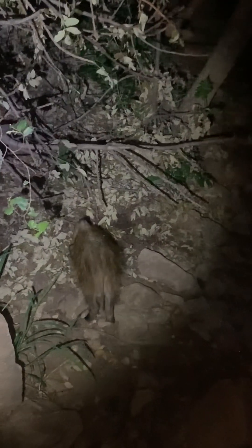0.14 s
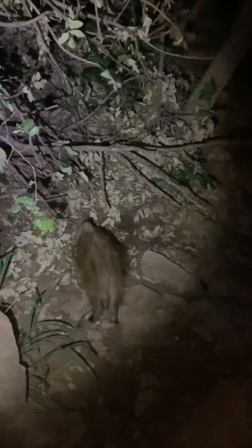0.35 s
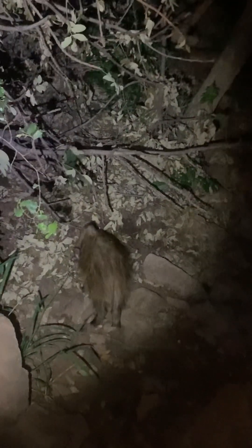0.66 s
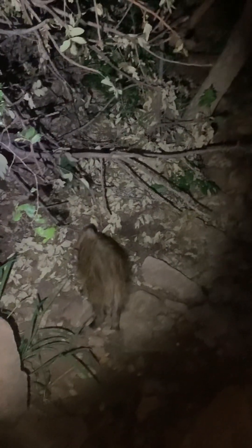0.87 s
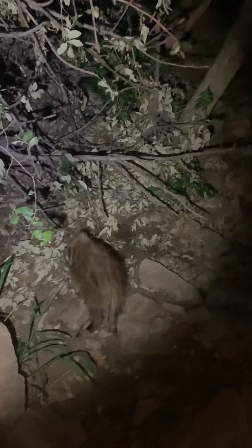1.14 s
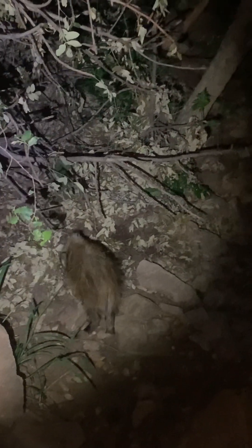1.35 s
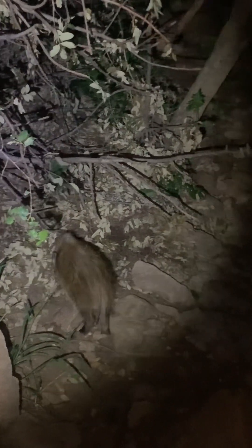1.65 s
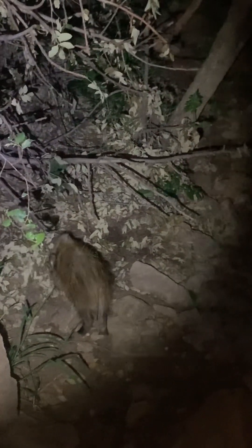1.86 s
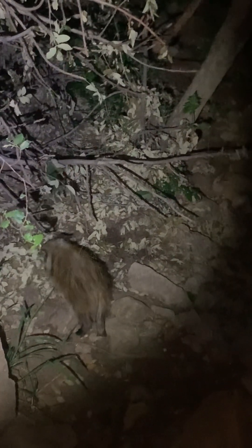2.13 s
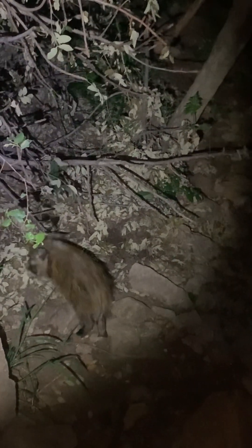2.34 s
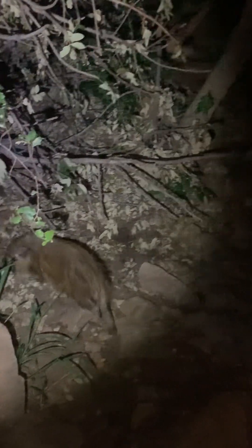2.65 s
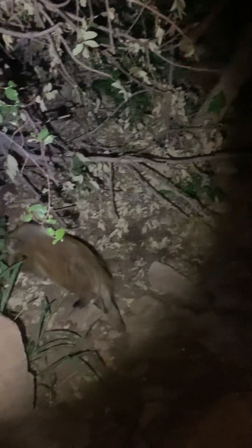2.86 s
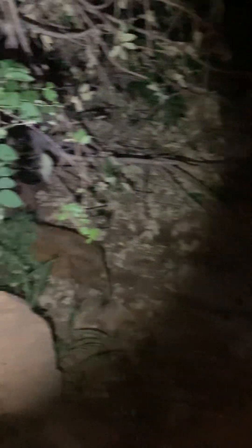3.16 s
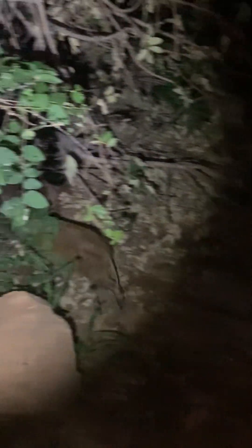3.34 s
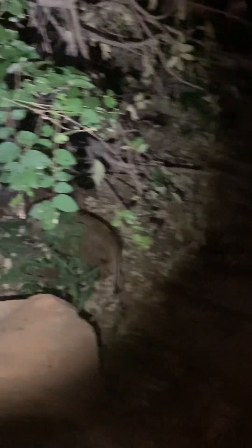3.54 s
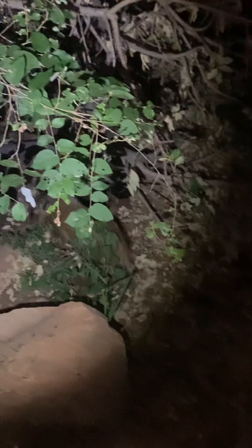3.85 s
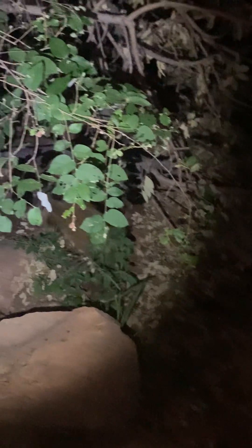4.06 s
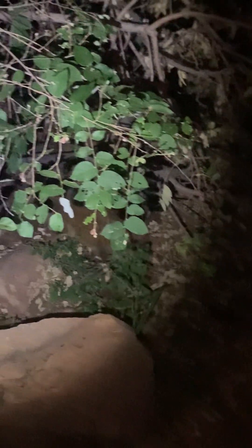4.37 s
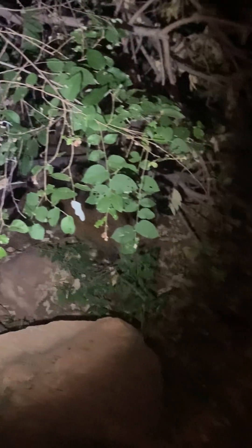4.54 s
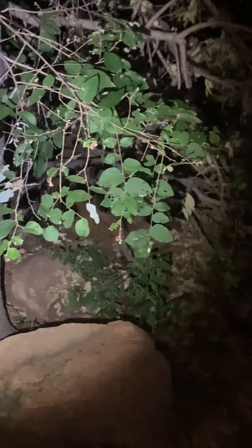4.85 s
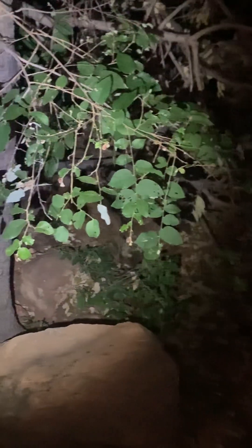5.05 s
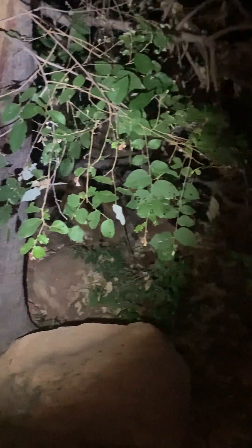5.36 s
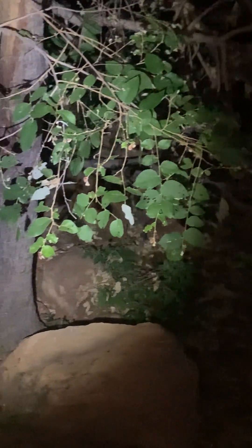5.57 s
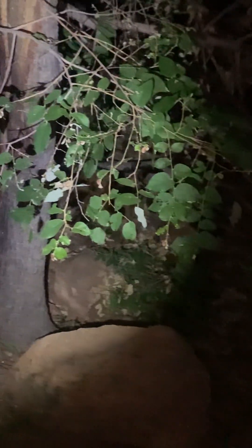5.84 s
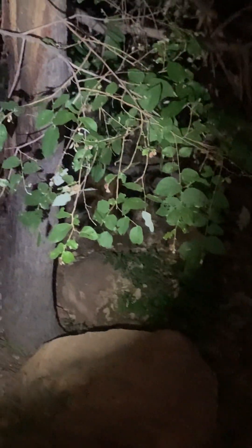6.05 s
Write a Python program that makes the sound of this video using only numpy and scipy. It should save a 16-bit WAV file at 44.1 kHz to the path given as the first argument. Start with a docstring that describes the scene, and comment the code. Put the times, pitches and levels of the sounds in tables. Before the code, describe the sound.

Dry leaves rustle and twigs snap as a small animal shuffles through night bush, faint crickets behind, then a katydid rasps rapidly close by.

```python
"""Dry leaves rustle and twigs crack first, as a small animal shuffles through the bush at night.
Leaves and twigs are coloured noise bursts; its feet are band-filtered knocks. Far crickets are gliding
sines blurred by echoes, over noise bands for the insect chorus, rumble and air. The hand that holds the
phone adds dull double thuds and faint rubbing. Late on, a katydid rasps close by, about fourteen strokes
a second, each stroke a row of ringing tooth impacts."""
import sys
import numpy as np
from scipy import signal
from scipy.fft import rfft, irfft
from scipy.io import wavfile
from scipy.ndimage import uniform_filter1d, map_coordinates

SR = 44100
rng = np.random.default_rng(int(sys.argv[2]) if len(sys.argv) > 2 else 0)


def inscribe(sig):
    """Save sig as 16-bit PCM at rate SR to the path in sys.argv[1].

    A 1-D sig is mono; a 2-D sig holds one channel per row.
    Samples are clipped to [-1, 1] before scaling.
    """
    pcm = np.round(np.clip(np.atleast_2d(sig).T, -1, 1) * 32767)
    wavfile.write(sys.argv[1], SR, pcm.astype(np.int16))


N = 273552
TIME = np.arange(N) / SR  # [s]


def undb(db):
    """Decibels are logarithmic: 20 dB is a tenfold amplitude gain."""
    return 10 ** (np.asarray(db) / 20)


def unit(x):
    """Normalization of power: scale to rms 1."""
    return x / np.sqrt(np.mean(x ** 2))


def curves(table):
    """Linear interpolation: the columns of a table joined by straight lines in time."""
    s, *columns = np.transpose(table)
    return [np.interp(TIME, s, column) for column in columns]


def gains(points, hz):
    """Frequency response: gain of a (frequency [Hz], level [dB]) spectrum on a logarithmic pitch axis."""
    f, db = np.transpose(points)
    return undb(np.interp(np.log(np.maximum(hz, 1)), np.log(f), db))


def colour(x, points):
    """Linear filtering: multiply the spectrum by a frequency response."""
    return irfft(rfft(x) * gains(points, np.fft.rfftfreq(N, 1 / SR)), N)


def walk(rate):
    """Smoothed random modulation: levels held 1 / rate seconds, averaged twice, rms 1."""
    hold = max(int(SR / rate), 2)
    steps = np.repeat(rng.standard_normal(N // hold + 1), hold)
    return unit(uniform_filter1d(uniform_filter1d(steps, hold), hold)[:N])


def add(track, s, sound):
    """Superposition: mix a short sound in at a time in seconds."""
    i = int(np.clip(s * SR, 0, N))
    track[i:i + len(sound)] += sound[:N - i]


# the two microphone ports: (frequency [Hz], phase by which the left leads [rad])
PORT_PHASE = [(20, -.7), (100, -.9), (600, -1.0), (1100, -.7), (1500, -.1), (2300, 1.9), (3100, 1.4),
              (3600, 1.9), (4800, 3.14), (7000, 6.28), (9750, 9.42), (12350, 12.57), (14700, 15.7),
              (16000, 17.4)]


def ports(x):
    """Interaural-style phase difference: equal levels at both ports, phase varying with frequency."""
    lead = np.interp(np.fft.rfftfreq(N, 1 / SR), *np.transpose(PORT_PHASE))
    return irfft(rfft(x) * np.exp(.5j * np.outer([1, -1], lead)), N)


def spread(draw, apart_db):
    """Partial coherence: a shared part widens when each port adds its own independent part."""
    return unit(ports(draw()) + undb(apart_db) * np.array([draw(), draw()]))


def both_sides(near, far, far_db):
    """Lateral superposition: one sound from the left, another from the right scaled by far_db."""
    return ports(near) + undb(far_db) * ports(far)[::-1]


def scatter(x, t60):
    """Reverberation: leaves and trunks scatter dense echoes that fall 60 dB in t60 seconds."""
    t = TIME[:SR]
    tail = rng.standard_normal(SR) * np.exp(-np.log(1000) * t / t60)
    return signal.fftconvolve(x, tail / np.linalg.norm(tail))[:N]


def patchy(x, depth_db, size=1024):
    """Band-wise amplitude modulation: narrow bands flicker in small random patches."""
    cells = signal.stft(x, nperseg=size)[2]
    flicker = uniform_filter1d(rng.standard_normal(cells.shape), size=3, axis=0)
    flicker = unit(uniform_filter1d(flicker, size=2, axis=1))
    return signal.istft(cells * undb(depth_db * flicker), nperseg=size)[1][:N]


def grains(per_s, spread_db):
    """Shot noise: lone clicks at random moments, mostly small and a few large."""
    hits = (rng.random(N) < per_s / SR) * np.sign(rng.standard_normal(N))
    return unit(hits * undb(spread_db * np.minimum(rng.exponential(size=N), 3)))


def crinkle(per_s, peak_db, decay_s):
    """Buckling of single leaves: a gain with sudden random flares that decay exponentially."""
    flares = (rng.random(N) < per_s / SR) * rng.uniform(.3, 1, N) * undb(peak_db)
    return unit(np.hypot(1, signal.lfilter([1], [1, -np.exp(-1 / (decay_s * SR))], flares)))


# high and low parts of the leaf sound: (frequency [Hz], relative density [dB per Hz])
LEAF_HISS_SPECTRUM = [(1500, -34), (3000, -2.5), (4500, 5), (5400, 2.8), (7000, 3), (8300, 1), (9500, -10),
                      (12500, -2.5), (13600, -6), (14300, -22), (15000, -58)]
LEAF_BODY_SPECTRUM = [(150, -28), (480, -14.5), (790, -18.5), (1150, -4.5), (1750, 0.5), (2400, -5),
                      (3300, 0), (5000, -37)]
# scuffs of the animal in the litter, levels before the trims in leaves():
# (time of the height [s], half-power length [s], hiss level [dB], body relative to hiss [dB])
LEAF_SCUFFS = [(.01, 0.13, -59.5, 0), (0.311, 0.067, -61, -1.5), (0.503, 0.12, -61, -3),
               (0.668, 0.038, -69.5, -3.5), (1.034, 0.12, -65, 0.5), (1.2, 0.075, -66.5, 1.5),
               (1.405, 0.17, -63, 0.5), (1.821, 0.17, -62, 0), (2.134, 0.19, -66.5, -1.5),
               (2.36, 0.061, -61, 0), (2.453, 0.053, -56, -4), (2.515, 0.055, -52.5, -5),
               (2.572, 0.046, -54, -7), (2.69, 0.15, -64.5, -1), (2.89, 0.088, -61.5, -2),
               (3.03, 0.18, -68, -6), (3.157, 0.2, -62.5, -3), (3.563, 0.18, -63, -6.5),
               (3.838, 0.13, -59.5, -1), (4.093, 0.19, -61.5, -3), (4.325, 0.091, -66, -2.5),
               (4.547, 0.17, -65, 1.5), (4.863, 0.08, -68, -1), (5.24, 0.3, -68, 0.5),
               (5.414, 0.031, -60.5, -2), (5.592, 0.24, -69, 3), (5.77, 0.062, -66.5, 1),
               (5.95, 0.052, -60.5, -5), (6.192, 0.049, -75, 4.5)]
SCUFF_EDGE = 1.71  # exponent: 1 = pointed swell, 2 = rounded
STIR_DB, STIR_BODY_DB = -74, -10  # between scuffs: hiss before trim, body relative to it


def leaves(hiss_db=6.0, body_db=-0.5, grain_db=2.0, flicker_db=1.5, patchy_db=5.5,
           crackle_db=-5, crackles_per_s=900, crackle_spread_db=3.5):
    """Frictional sliding of dry leaves: countless tiny uneven cracks swell and fade with each scuff."""
    hiss_power, body_power = undb(STIR_DB) ** 2, undb(STIR_DB + STIR_BODY_DB) ** 2
    for s, length, db, body_rel_db in LEAF_SCUFFS:
        swell = undb(db) ** 2 * .5 ** (np.abs(2 * (TIME - s) / length) ** SCUFF_EDGE)
        hiss_power = hiss_power + swell
        body_power = body_power + swell * undb(body_rel_db) ** 2

    def cracks():
        """Granular noise: an uneven rub with lone crackles."""
        rub = rng.standard_normal(N) * undb(grain_db * rng.exponential(size=N))
        rub = unit(patchy(rub, patchy_db))
        return rub + undb(crackle_db) * grains(crackles_per_s, crackle_spread_db)

    left, right = (colour(cracks(), LEAF_HISS_SPECTRUM) for _ in range(2))
    hiss = unit(both_sides(left, right, far_db=-8.0)) * undb(hiss_db) * np.sqrt(hiss_power)
    body = spread(lambda: colour(cracks(), LEAF_BODY_SPECTRUM), apart_db=-1.0)
    body = body * undb(body_db) * np.sqrt(body_power)
    hiss = hiss * crinkle(per_s=48, peak_db=-5, decay_s=0.0023)
    body = body * crinkle(per_s=26, peak_db=6.5, decay_s=0.0037)
    return (hiss + body) * undb(flicker_db * walk(70))


# the far insect chorus: (frequency [Hz], relative density [dB per Hz])
CHORUS_SPECTRUM = [(3000, -30), (3350, -3), (3520, 12), (3680, -1), (3900, -36), (8000, -47), (10500, 7.5),
                   (12700, 6), (13600, -6), (14500, -38), (15000, -65)]


def chorus(level_db=-66.5, sway_db=1, patchy_db=4, right_db=-7):
    """Incoherent summation: many distant insects merge into a thin steady line and a high hiss."""
    left, right = (unit(colour(patchy(rng.standard_normal(N), patchy_db), CHORUS_SPECTRUM))
                   for _ in range(2))
    return both_sides(left, right, right_db) * undb(level_db + sway_db * walk(6.06))


# spells of low rumble: (start [s], end [s])
SPELL_TIMES = [(.195, 5.06), (5.405, 5.93), (6.075, 6.3)]
SPELL_EDGE_S = 0.014


def spells():
    """Gating with short ramps: 1 during the spells of rumble, 0 in the lulls."""
    return sum(np.clip(np.minimum(TIME - start, end - TIME) / SPELL_EDGE_S + .5, 0, 1)
               for start, end in SPELL_TIMES)


# low rumble and far air: (frequency [Hz], relative density [dB per Hz])
RUMBLE_SPECTRUM = [(15, -14), (30, -4), (56, 4.5), (75, -4.5), (115, -11.5), (155, -33), (220, -49),
                   (450, -27), (800, -75)]
AIR_SPECTRUM = [(40, 7.5), (140, 0), (240, -6), (330, -4.5), (460, 0), (560, 1), (660, -5), (800, -22.5),
                (1050, -8.5), (1500, -20.5), (3200, -16), (4200, -31), (7000, -20), (14000, -75)]
# slow drift in the spells, before trim and sway: (time [s], rumble level [dB], air level [dB])
NIGHT_DRIFT = [(.2, -55, -67), (.5, -52, -64.5), (.8, -54.5, -70.5), (1.3, -52.5, -68.5),
               (1.6, -54.5, -68.5), (2.2, -51, -75), (2.55, -55, -64), (3.0, -55.5, -70),
               (3.6, -59.5, -68.5), (4.3, -54, -71.5), (4.9, -52.5, -71), (5.42, -58, -64),
               (5.62, -62, -76), (5.85, -55.5, -64), (6.1, -55.5, -66)]
LULL_RUMBLE_DB, LULL_AIR_DB = -79.5, -75.5  # between spells, before trim and sway


def night(rumble_db=-1.5, sway_db=2.5, throb_db=2.0, patchy_db=5.5):
    """Modulated band noise: an uneven low rumble drops away in the lulls, under faint far-off air."""
    on = spells()
    rumble_drift, air_drift = curves(NIGHT_DRIFT)
    rumble_level = on * rumble_drift + (1 - on) * LULL_RUMBLE_DB
    air_level = on * air_drift + (1 - on) * LULL_AIR_DB
    rumble = spread(lambda: colour(rng.standard_normal(N), RUMBLE_SPECTRUM), apart_db=-9.5)
    air = spread(lambda: colour(patchy(rng.standard_normal(N), patchy_db), AIR_SPECTRUM), apart_db=11.5)
    rumble = rumble * undb(rumble_level + rumble_db + throb_db * walk(30))
    return rumble + air * undb(air_level + sway_db * walk(10))


# twigs and dry leaves that snap: (time [s], crack level before snap_db [dB], decay constant [s])
TWIG_SNAPS = [(0.019, -29.5, 0.0025), (0.0934, -29.5, 0.0014), (0.658, -40, .002), (2.356, -36.5, 0.0034),
              (2.407, -41, 0.0034), (2.498, -34, .0015), (2.52, -29, .002), (2.523, -26, .0015),
              (2.5568, -25.5, 0.0017), (2.680, -40.5, .002), (2.8422, -31, .003), (2.848, -31, .002),
              (2.8532, -27.5, .002), (2.859, -36, 0.0025), (2.966, -43, .002), (2.9795, -32, 0.0016),
              (2.9952, -35, .004), (3.164, -40, .003), (3.169, -32.5, 0.0023), (3.372, -37, .0015),
              (4.206, -40, .003), (5.416, -32, .002), (5.954, -28.5, .003)]


def twigs(snap_db=-8.0, tail_s=0.017, tail_db=-18, splinter_db=3):
    """Brittle fracture: a broadband crack, then a splintery shiver of the leaves around it."""
    out, t = np.zeros(N), TIME[:SR // 10]
    for s, db, crack_s in TWIG_SNAPS:
        # the shiver's gain jumps every 30 samples
        splinters = np.repeat(undb(splinter_db * rng.exponential(size=len(t))), 30)[:len(t)]
        shiver = undb(tail_db) * unit(splinters) * np.exp(-t / tail_s)
        fade = np.exp(-t / crack_s) + shiver
        add(out, s, rng.standard_normal(len(t)) * fade * undb(db + snap_db))
    return ports(colour(out, [(800, -34), (1500, -16), (4000, 0.0), (7500, 2.5), (11000, 1.0), (15000, -21)]))


# nearer crickets: (start [s], length [s], starting pitch [Hz], glide over the chirp [Hz],
# level before level_db and flutter [dB])
CRICKET_CHIRPS = [(.19, .15, 3610, 45, -57.5), (.33, .16, 3490, 65, -55), (.66, .1, 3510, 0, -66),
                  (.82, .15, 3595, -45, -56.5), (.94, .09, 3550, 30, -64), (1.11, .1, 3515, 0, -63),
                  (1.23, .22, 3610, -55, -59.5), (1.535, .085, 3440, 25, -58.5),
                  (1.67, .11, 3610, -50, -61.5), (1.765, .075, 3530, 80, -59.5),
                  (1.965, .12, 3490, -50, -57), (2.09, .1, 3440, 20, -63), (2.39, .12, 3485, -40, -62),
                  (2.85, .14, 3460, -5, -55.5), (3.275, .115, 3505, -65, -57),
                  (4.275, .09, 3665, -15, -61.5), (4.37, .12, 3425, 60, -63.5), (4.68, .14, 3500, 45, -60),
                  (4.815, .125, 3500, -80, -62), (5.015, .12, 3605, 5, -62), (5.17, .17, 3610, -90, -54),
                  (5.27, .11, 3530, -90, -60), (5.62, .115, 3635, -70, -57), (5.73, .15, 3550, -25, -63),
                  (6.04, .16, 3635, -85, -56.5)]
# farther chirps at random times; level before level_db and flutter
FAR_CHIRP_S, FAR_CHIRP_HZ, FAR_SPREAD_HZ, FAR_CHIRP_DB = 0.17, 3550, 78, -72.5


def crickets(level_db=-3.5, echo_db=-5.0, t60=0.47, waver_hz=12, flutter_db=3.0, count=8):
    """Frequency-modulated tones: nearly pure chirps swell and slide, blurred by scattering in the trees."""
    out, waver = np.zeros(N), waver_hz * walk(120)
    flutter = unit(undb(flutter_db * walk(110)))
    far = []
    for k in range(count):
        start = (k + rng.random()) * TIME[-1] / count
        pitch = FAR_CHIRP_HZ + FAR_SPREAD_HZ * rng.standard_normal()
        far.append((start, FAR_CHIRP_S, pitch, 0, FAR_CHIRP_DB))
    for s, length, hz, glide, db in list(CRICKET_CHIRPS) + far:
        u = np.linspace(0, 1, int(length * SR))
        pitch = hz + glide * u + np.roll(waver, -int(s * SR))[:len(u)]
        swell = np.sin(np.pi * u).clip(0) ** 0.56
        tone = np.sqrt(2) * np.sin(2 * np.pi * np.cumsum(pitch) / SR)
        add(out, s, undb(db) * swell * tone)
    out = out * flutter
    echoes = spread(lambda: scatter(out, t60), apart_db=-7.5) * np.sqrt(np.mean(out ** 2))
    return undb(level_db) * (ports(out) + undb(echo_db) * echoes)


# fingers rubbing on the case: (frequency [Hz], relative density [dB per Hz])
GRIP_SPECTRUM = [(90, -8), (160, 5), (260, -0.5), (400, 0), (560, -7), (750, -28), (1200, -53)]


def grip(level_db=-82, slips_per_s=70, spread_db=3.5, sway_db=3):
    """Stick-slip friction: fingers jerk dully on the case during the rumble spells, with swaying level."""
    slips = ports(unit(colour(grains(slips_per_s, spread_db), GRIP_SPECTRUM)))
    return slips * spells() * undb(level_db + sway_db * walk(6.97))


# bumps of the hand on the phone:
# (time [s], peak before the fade-in [dB], upper cutoff [Hz], delay until the finger lands again [s])
HAND_BUMPS = [(0.485, -45, 90, 0.0038), (0.534, -46, 165, .001), (0.652, -47, 90, 0.0065),
              (0.738, -46.5, 90, 0.0032), (0.854, -47.5, 90, 0.0027), (0.939, -43, 90.5, 0.0044),
              (1.134, -48.5, 129, 0.0027), (1.245, -50, 170, 0.0027), (1.71, -52.5, 170, 0.0029),
              (1.929, -52, 80, 0.0037), (2.951, -45.5, 65, .004), (3.92, -49, 160, 0.0028),
              (4.676, -44, 99, 0.0024), (5.030, -25, 850, 0.0013), (5.890, -57, 380, 0.0034),
              (5.909, -38.5, 455, 0.0043)]
# colour of a bump: (frequency [Hz], relative level [dB])
BUMP_SPECTRUM = [(20, -32), (40, -4), (60, 4), (100, -1), (170, -6), (300, -9), (500, -16), (700, -25),
                 (1000, -43), (1500, -58)]
REBOUND_DB = -6.5  # second landing relative to the first


def bumps(late_cycles=1.3, attack_s=0.0029):
    """Dispersion of a double impact: the lows arrive last, so each dull thud drops in pitch."""
    out, hz = np.zeros(N), np.maximum(np.fft.rfftfreq(SR, 1 / SR), 1)
    # each frequency is late by late_cycles of its own periods
    delay_cycles = late_cycles * np.log(hz / hz[-1]) + attack_s * hz
    for s, db, top_hz, again_s in HAND_BUMPS:
        contacts = 1 + undb(REBOUND_DB) * np.exp(-2j * np.pi * hz * again_s)
        spectrum = contacts * gains(BUMP_SPECTRUM, hz) / np.sqrt(1 + (hz / top_hz) ** 8)
        thud = irfft(spectrum * np.exp(-2j * np.pi * delay_cycles), SR)[:SR // 4]
        fade_in = np.minimum(TIME[:len(thud)] / attack_s, 1)
        add(out, s, thud * fade_in * undb(db) / np.abs(thud).max())
    return ports(out)


# dull footfalls on stones, roots and sticks:
# (time [s], peak level [dB], pitch [Hz], half-width of the band [natural log of frequency ratio])
FOOT_STEPS = [(1.005, -55, 560, 0.41), (1.139, -57, 300, 0.35), (1.19, -51, 1670, 0.23),
              (1.25, -57, 300, 0.3), (1.653, -53, 556, 0.42), (1.73, -56.5, 282, 0.43),
              (2.147, -50.5, 425, 0.26), (2.448, -49, 1780, 0.14), (2.707, -52, 525, 0.15),
              (2.847, -46.5, 390, 0.28), (2.908, -51.5, 1690, 0.19), (2.994, -56.5, 350, 0.26),
              (4.2, -59, 280, .5), (4.203, -52, 1500, 0.17), (5.487, -56, 1490, 0.17),
              (5.811, -54, 1260, 0.087), (6.07, -53.5, 630, 0.16)]


def footfalls(decay_s=0.011, crunch_db=-19, grain_db=3.0):
    """Damped resonance: a soft foot gives a short knock with a little dry crunch."""
    out, t = np.zeros(N), TIME[:SR // 10]
    crunch_band = signal.butter(1, [250, 2600], "band", fs=SR, output="sos")
    for s, db, hz, width in FOOT_STEPS:
        grit = undb(grain_db * rng.exponential(size=len(t)))
        push = rng.standard_normal(len(t)) * grit * np.exp(-t / decay_s)
        knock_band = signal.butter(2, hz * np.exp([-width, width]), "band", fs=SR, output="sos")
        knock = signal.sosfilt(knock_band, push) + undb(crunch_db) * signal.sosfilt(crunch_band, push)
        add(out, s, knock * undb(db) / np.abs(knock).max())
    return ports(out)


FIRST_STROKE_S, STROKE_S = 4.6827, .07145  # first shutting of the wings, settled gap
HURRY_S, SETTLE_STROKES = .008, 1.2  # shortening of the first gap, strokes to settle
# first stroke's level and share by which it is shorter, and the time constant of warming up
FIRST_STROKE_DB, FIRST_SHORTER, WARM_UP_S = -1, .08, 0.37


def strokes(count=23, uneven_db=.5):
    """Exponential relaxation: (time, level, relative length), hurried, short and soft, then nearly even."""
    gaps = STROKE_S - HURRY_S * np.exp(-np.arange(count - 1) / SETTLE_STROKES)
    since = np.append(0, np.cumsum(gaps))
    cold = np.exp(-since / WARM_UP_S)
    level = FIRST_STROKE_DB * cold + uneven_db * rng.standard_normal(count)
    return zip(FIRST_STROKE_S + since, level, 1 - FIRST_SHORTER * cold)


# one nominal stroke, before its random variations:
# (time from the shutting [s], tooth rate [1/s], relative force [dB], wing pitch [Hz])
STROKE_COURSE = [(-.046, 1000, -25, 12600), (-.038, 1000, -14, 12750), (-.030, 1050, -8.5, 12750),
                 (-.021, 1000, -4, 12350), (-.010, 540, 0.5, 12180), (-.005, 520, -4, 11200),
                 (0, 750, -9.5, 10050), (.012, 1000, -13.5, 10570), (.028, 1000, -20.5, 11200)]
# the katydid's voice through the foliage: (frequency [Hz], gain [dB])
WING_RESPONSE = [(5000, -17), (8000, -4), (9200, -0.5), (10050, 0.5), (10650, -2), (11150, -1.5),
                 (11550, 1.5), (12200, -6), (12900, 4), (13700, 0.5), (14300, 1), (14800, -15),
                 (15500, -21)]
MIRROR_S = .002072  # delay of the reflection from a surface just behind the katydid


def katydid(level_db=-28.5, ring_s=0.00011, uneven_db=1.0, jitter=0.12, shut_db=-14.0,
            smear_db=-14.5, smear_s=0.0023, echo_db=-11.5, t60=0.35, vary=0.07, detune=0.026,
            mirror_db=-9, zip_vary=.035):
    """Stridulation: file teeth ring the wing with changing force and pitch; a falling zip shuts it."""
    out, t = np.zeros(N), TIME[:SR // 125]
    when, rate, force_db, wing_hz = np.transpose(STROKE_COURSE)
    u = np.linspace(0, 1, len(t))
    for s, db, length in strokes():
        at = when[0]
        # no two strokes are equally long or bright
        stretch, sharp = 1 + np.array([vary, detune]) * rng.standard_normal(2)
        for gap, size, tune in rng.standard_normal((100, 3)):
            if at > when[-1]:
                break
            # each ring of the wing carries a weaker, irregular shudder
            shudder = unit(uniform_filter1d(rng.standard_normal(len(t)), size=9)) * np.exp(-t / smear_s)
            ring = t / ring_s * np.exp(1 - t / ring_s) + undb(smear_db) * shudder
            hz = np.interp(at, when, wing_hz) * (sharp + 0.0323 * tune)
            tooth_db = db + np.interp(at, when, force_db) + uneven_db * size
            add(out, s + at * stretch * length, ring * np.sin(2 * np.pi * hz * t) * undb(tooth_db))
            at += np.exp(jitter * gap) / np.interp(at, when, rate)
        zip_hz = np.interp(u, [0, 1], [11900, 5500]) * (1 + zip_vary * rng.standard_normal())
        zip_down = np.sin(np.pi * u) ** 2 * np.sin(2 * np.pi * np.cumsum(zip_hz) / SR)
        add(out, s - 0.66 * t[-1], zip_down * undb(db + shut_db + rng.standard_normal()))
    # interpolation allows a delay between whole samples
    out = out + undb(mirror_db) * map_coordinates(out, [(TIME - MIRROR_S) * SR])
    direct, echoes = colour(out, WING_RESPONSE), colour(scatter(out, t60), WING_RESPONSE)
    return both_sides(direct, echoes, echo_db) * undb(level_db)


def scene():
    """Linear superposition of the animal, the insects, the hand and the night around them."""
    animal = leaves() + twigs() + footfalls()
    insects = chorus() + crickets() + katydid()
    hand = grip() + bumps()
    return animal + insects + hand + night()


def record(dry):
    """Band limitation: the phone passes the sound below 15.6 kHz through a steep low-pass."""
    return signal.sosfilt(signal.ellip(10, .2, 80, 15600, fs=SR, output="sos"), dry)


dry = scene()
out = record(dry)
inscribe(out)
```